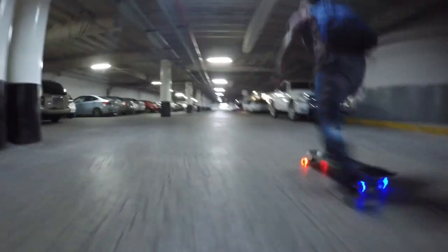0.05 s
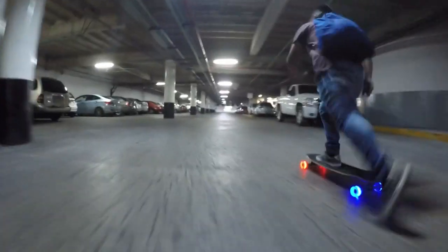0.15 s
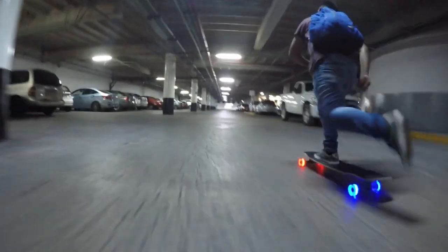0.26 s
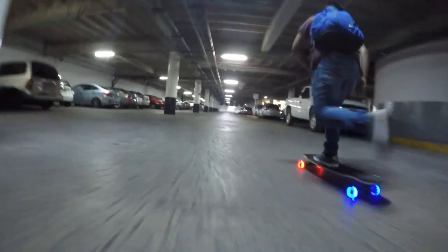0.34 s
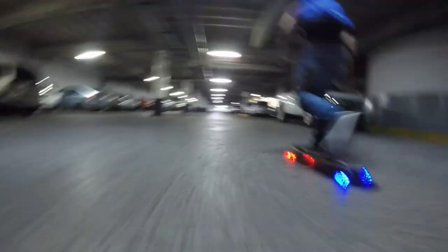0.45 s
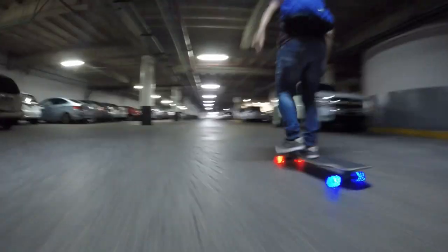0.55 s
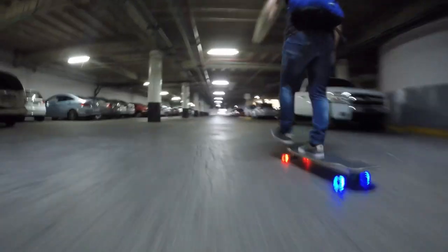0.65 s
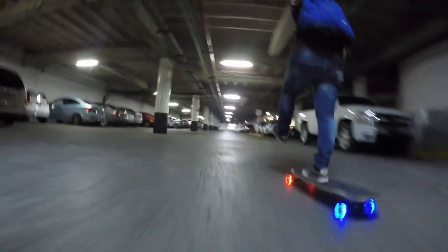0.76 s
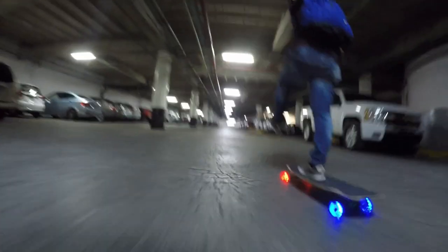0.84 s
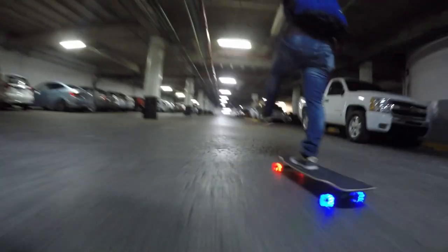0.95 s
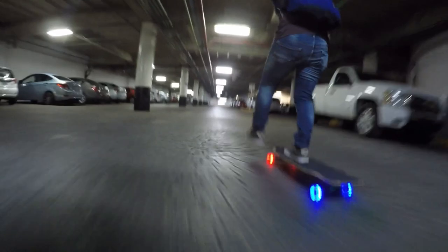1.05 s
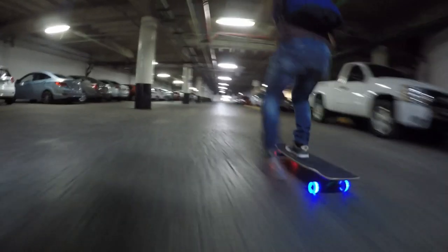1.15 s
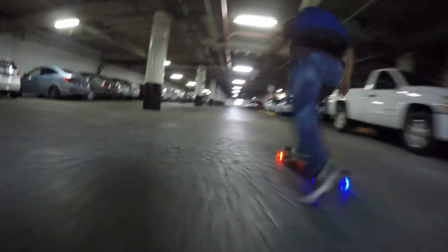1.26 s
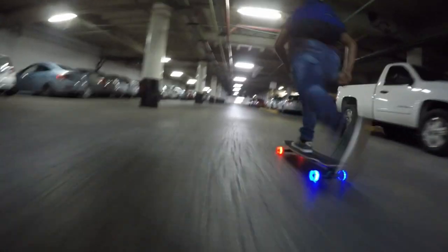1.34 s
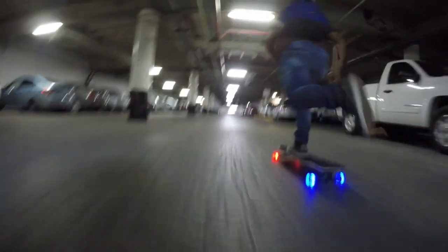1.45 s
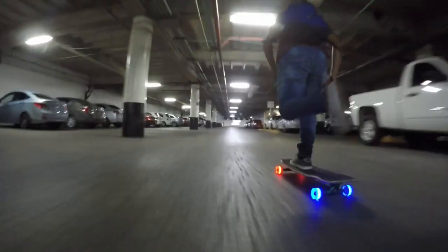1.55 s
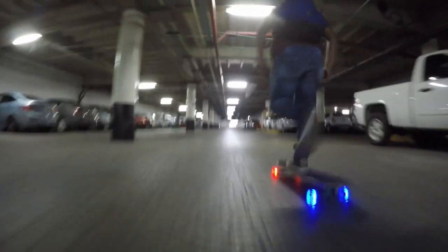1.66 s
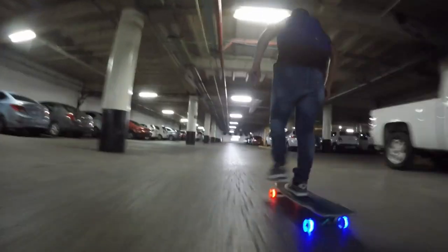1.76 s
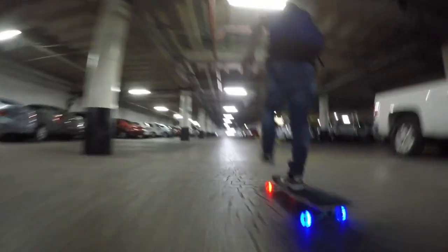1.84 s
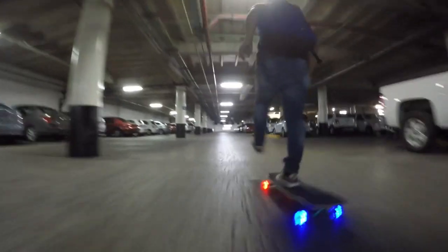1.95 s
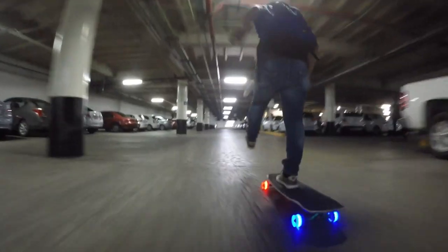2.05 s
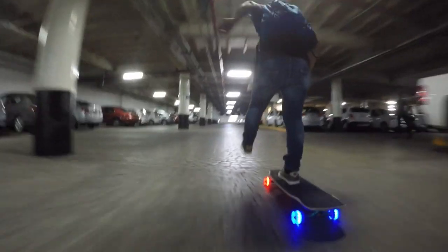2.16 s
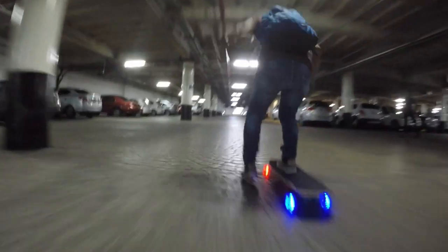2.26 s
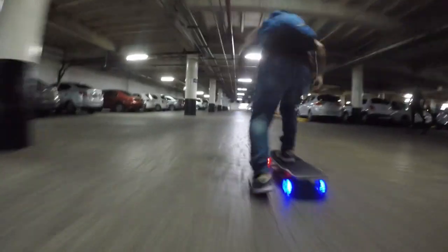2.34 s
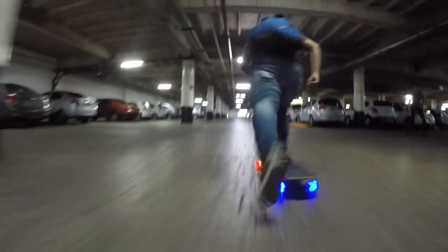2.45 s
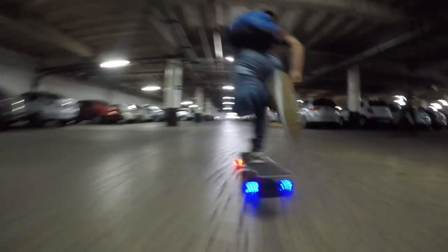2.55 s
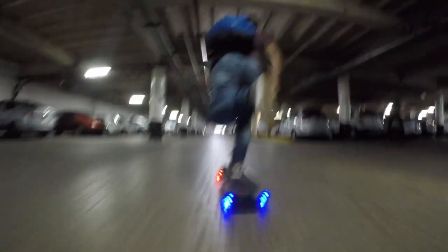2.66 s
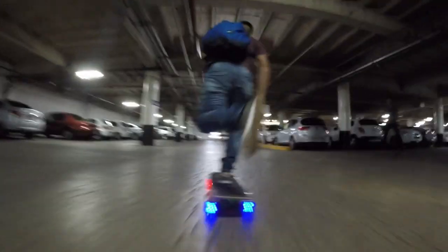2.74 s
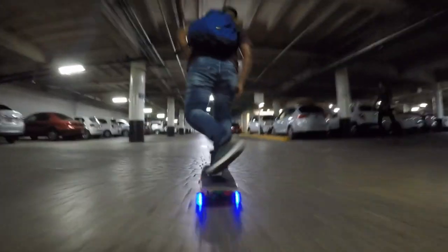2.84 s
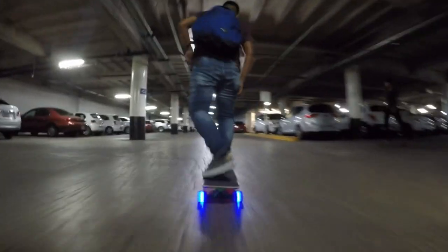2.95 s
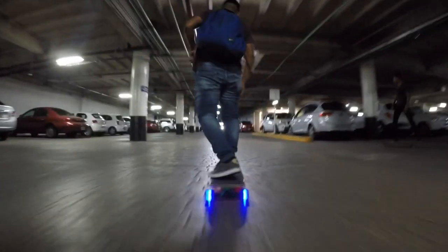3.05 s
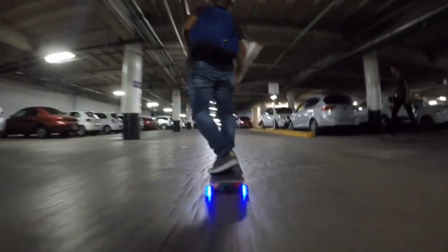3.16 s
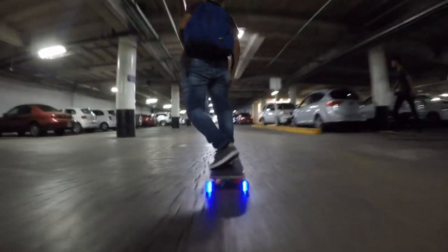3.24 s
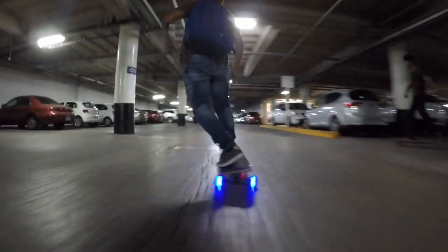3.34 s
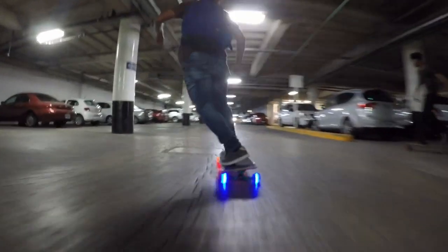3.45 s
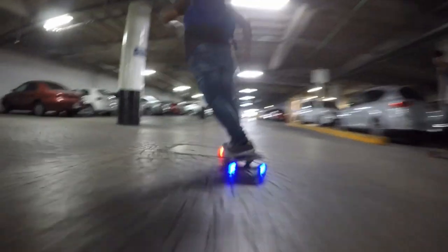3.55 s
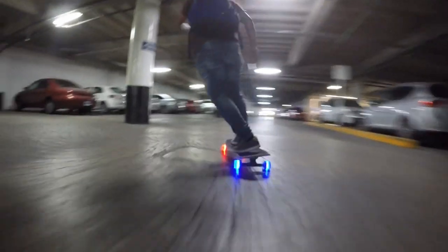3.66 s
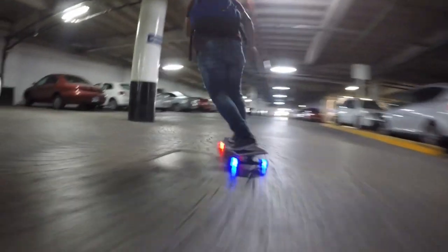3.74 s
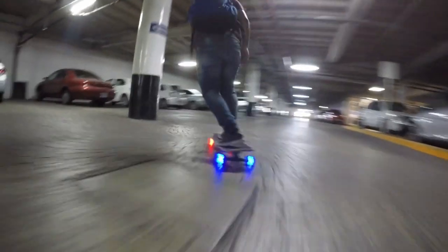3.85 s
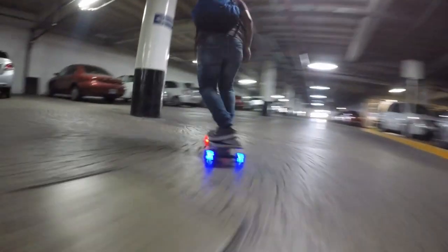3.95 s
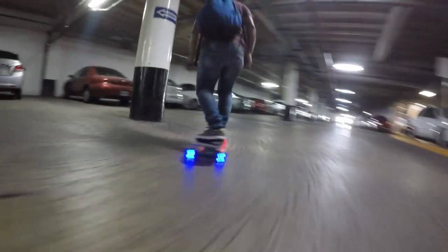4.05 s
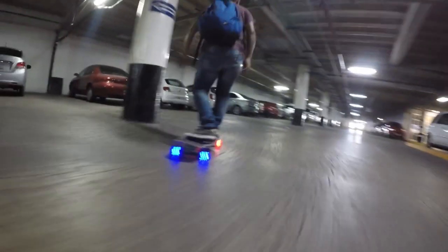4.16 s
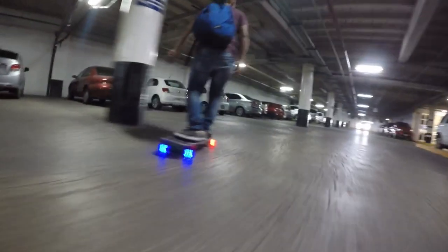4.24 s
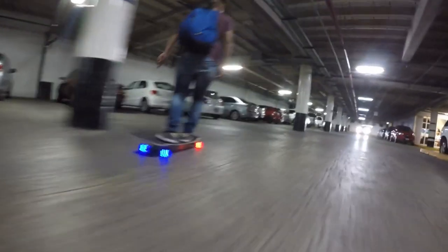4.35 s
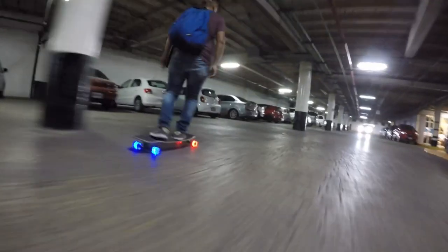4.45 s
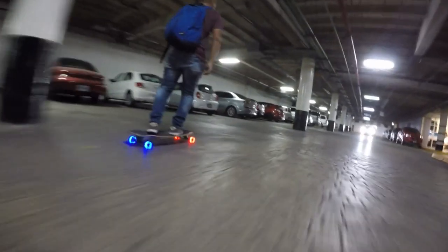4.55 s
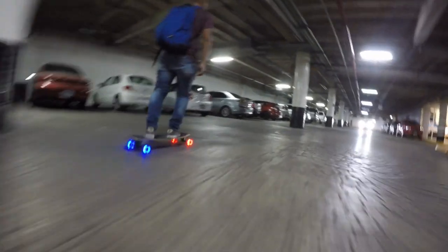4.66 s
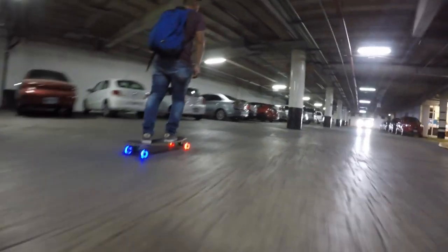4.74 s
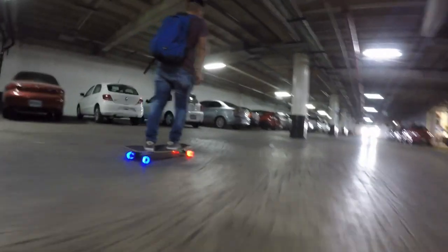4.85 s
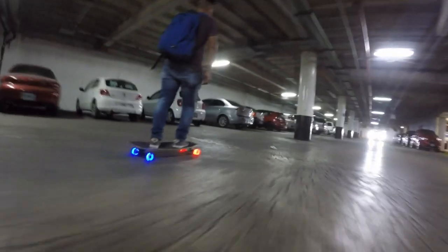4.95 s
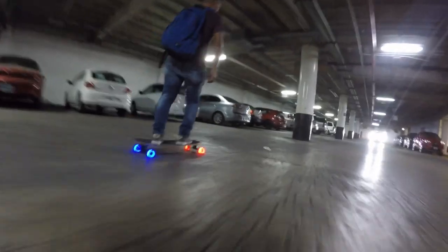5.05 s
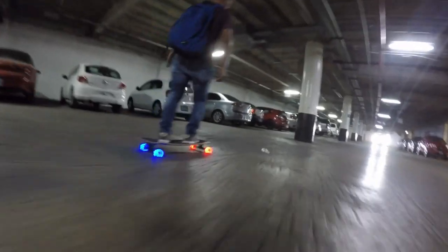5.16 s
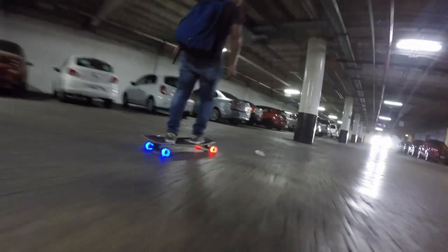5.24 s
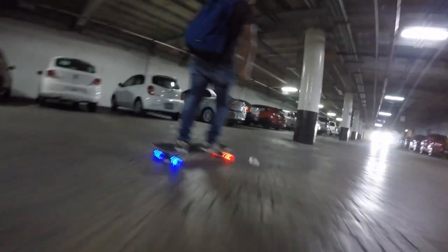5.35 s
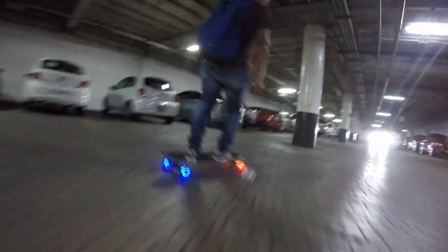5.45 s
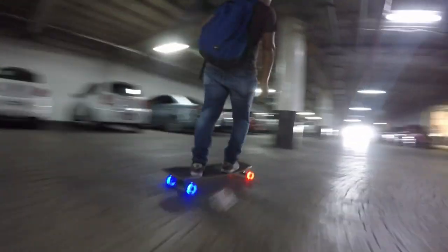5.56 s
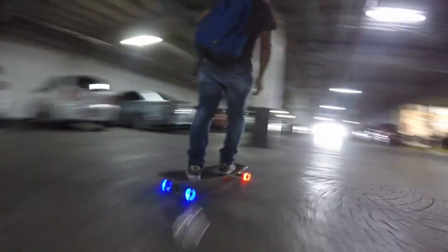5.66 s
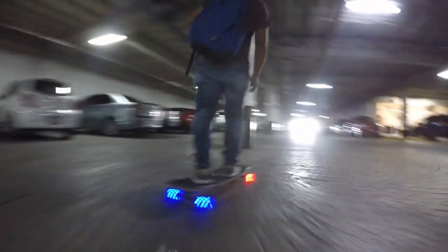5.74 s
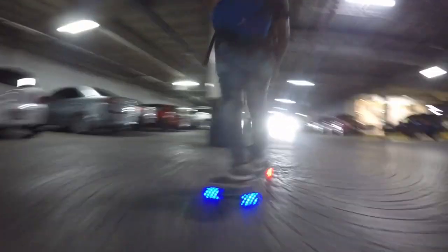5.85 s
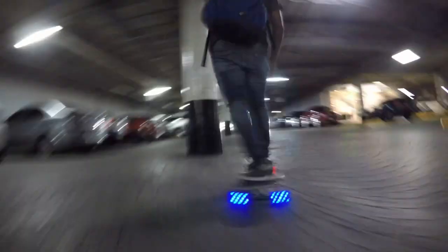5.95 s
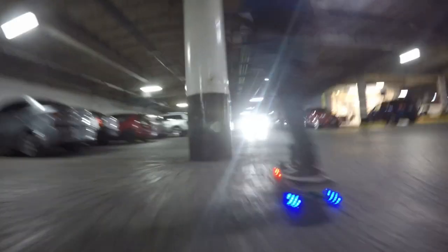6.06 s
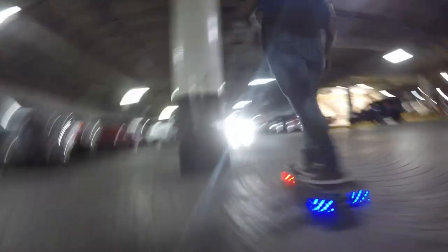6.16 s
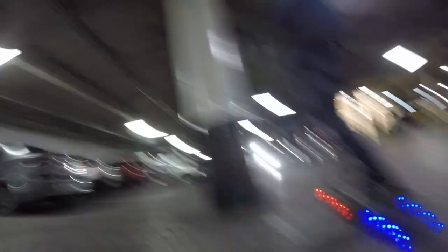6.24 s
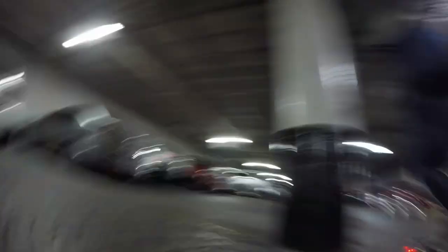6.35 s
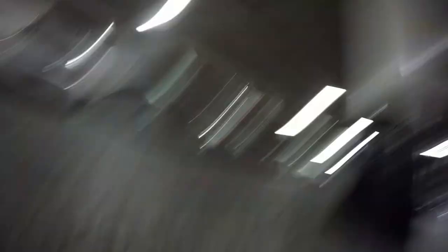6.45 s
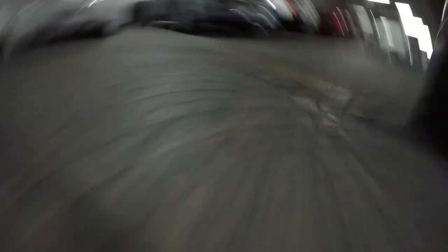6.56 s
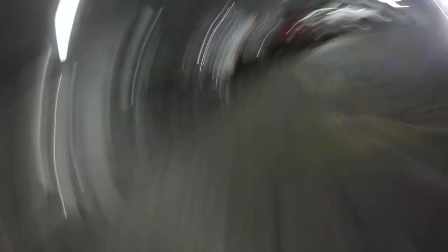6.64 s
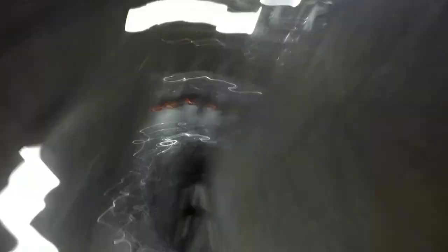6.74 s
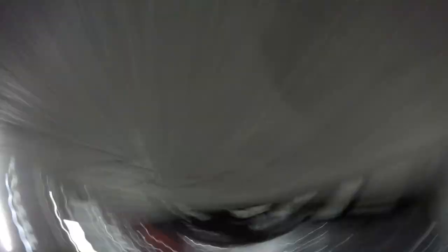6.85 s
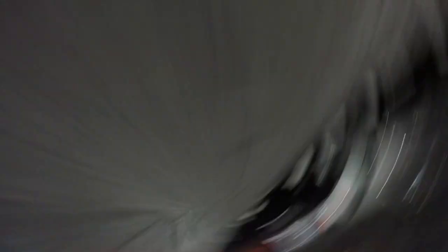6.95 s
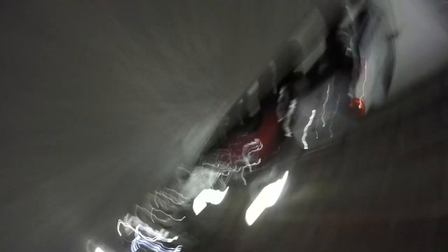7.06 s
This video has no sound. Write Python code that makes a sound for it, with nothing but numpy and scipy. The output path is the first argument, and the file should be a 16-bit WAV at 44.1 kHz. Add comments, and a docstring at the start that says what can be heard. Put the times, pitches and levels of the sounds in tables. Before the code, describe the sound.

Close rolling urethane wheels on rough concrete, with truck rattle, dry clusters of clacks and soft bassy wind buffeting, in a large reverberant garage. The roll continues for about six seconds, rougher over pitted patches. Then a short gritty skid with thin sinking squeals, raspy stick-slip chirps, a burst of low wind, and a tumbling microphone striking the floor in overloaded, pitch-diving blows before near silence.

```python
"""Longboard skid in a parking garage

A longboard rolls over concrete, the microphone riding low just behind it: shaped impact noise makes the
rumble and crackle, struck modes the clacks of loose hardware, slow noise the wind on the port.
Then the wheels skid as scraping noise with sinking squeals and chirp in stick-slip pulses, while the
microphone tumbles and knocks on the floor with pitch-diving blows and low thuds.
"""
import sys
import numpy as np
from scipy import signal
from scipy.fft import rfft, irfft
from scipy.io import wavfile
from scipy.ndimage import uniform_filter1d, map_coordinates

SR = 44100
rng = np.random.default_rng(int(sys.argv[2]) if len(sys.argv) > 2 else 0)


def unload_audio(sound):
    """Save the sound as a 16-bit wav file, at the path given as the first command line argument."""
    columns = np.transpose(np.atleast_2d(sound))
    # keep every value between -1 and 1, then stretch to whole-number steps
    steps = np.round(np.clip(columns, -1, 1) * 32767)
    wavfile.write(sys.argv[1], SR, steps.astype(np.int16))


N = 313110
T = np.arange(N) / SR  # s

# Air on the port: gusts on top of the breeze.
# Each row: centre in seconds, half length in seconds, level at the top in dB before buffeting.
GUSTS = [(0.575, 0.19, -22), (1.74, 0.085, -20), (2.66, 0.15, -23), (4.62, 0.1, -25), (6.082, 0.18, -20)]
# Spectrum of the wind. Each row: frequency in Hz, relative level in dB.
WIND_COLOUR = [(12, -8.5), (31, -0.5), (39, 5), (52, -8), (80, -15.5), (130, -34), (250, -38.5), (800, -83)]
# Roughness of the floor under the wheels. Each row: time in seconds, rumble level in dB before trim.
FLOOR_ROUGHNESS = [(0.0, -41), (0.6, -40), (0.78, -31), (0.81, -40), (1.23, -42), (2.98, -37.5),
                   (3.41, -36.5), (4.56, -44.5), (4.66, -36.5), (5.95, -42)]
# Spectrum of the rolling rumble. Each row: frequency in Hz, relative level in dB.
RUMBLE_COLOUR = [(60, -1.5), (145, 1.5), (215, -7), (360, 1.5), (460, -2.5), (610, 1.5), (760, -6),
                 (950, -4.5), (1150, -18), (1600, -12.5), (2300, -38), (5000, -66), (15000, -73.5)]
# Spectrum of grit and of the dry crack in a clack. Each row: frequency in Hz, relative level in dB.
GRIT_COLOUR = [(400, -20), (950, 9.5), (1150, -1.5), (1750, 5), (2400, -20), (2900, -0.5), (3300, -29.5),
               (3900, -11), (5000, -41), (15000, -45)]
# Pitted patches that shake the trucks.
# Each row: centre in seconds, half length in seconds, shaking level in dB before trims.
PITTED_PATCHES = [(0.607, 0.14, -37), (1.812, 0.21, -41.5), (2.596, 0.076, -36), (3.014, 0.12, -35.5),
                  (3.6, 0.2, -39.5), (5.824, 0.28, -42.5)]
# Spectrum of the hollow drone. Each row: frequency in Hz, relative level in dB.
HOLLOW_COLOUR = [(200, -30), (340, 3), (450, -11), (570, -7), (900, -23), (2500, -55)]
# Clacks of the board over bumps. Each row: start in seconds, short-term rms maximum in dB before trim.
CLACKS = [(0.202, -22.5), (0.243, -23), (0.398, -23), (0.455, -18.5), (0.621, -14.5), (0.641, -16),
          (0.652, -14.5), (0.705, -9), (0.728, -16), (0.741, -10), (0.765, -17), (0.82, -24),
          (0.982, -23.5), (1.459, -22.5), (1.772, -22), (1.849, -20), (1.871, -19), (1.93, -19),
          (2.117, -21), (2.363, -17), (2.456, -16.5), (2.56, -19.5), (2.588, -16), (2.605, -19),
          (2.726, -20), (2.866, -15), (2.886, -16), (2.934, -16), (2.962, -16.5), (3.043, -20),
          (3.057, -18.5), (3.071, -22), (3.36, -26), (3.5, -18.5), (3.514, -19.5), (3.574, -11.5),
          (3.646, -21), (3.687, -18), (3.753, -20), (3.799, -16), (3.842, -22.5), (4.71, -18.5),
          (4.815, -21), (5.054, -12.5), (5.587, -17.5), (5.624, -21), (5.654, -17.5), (5.886, -20.5)]
# Modes of deck and trucks. Each row: frequency in Hz, relative level in dB, t60 in seconds.
BOARD_MODES = [(381.5, -9.5, 0.087), (607, -6, 0.073), (830, 3, 0.041), (1023.5, 6, 0.045),
               (1283, 4.5, 0.066), (1497, 5.5, 0.035), (1730, 9.5, 0.022), (2140, 0, 0.035),
               (2543, -8.5, 0.046), (2918, -9.5, 0.03), (3740, -9.5, 0.019)]
# Spectrum of the scrape and of the tread hiss. Each row: frequency in Hz, relative level in dB.
SCRAPE_COLOUR = [(450, -12), (880, 6.5), (1150, -3), (2100, -1), (2700, 6.5), (3300, -4.5), (4000, 0),
                 (4900, -8), (7700, -14.5), (13000, -31), (15000, -41)]
# Surges in which the wheels dig in harder.
# Each row: centre in seconds, half length in seconds, friction level in dB.
SKID_SURGES = [(6.037, 0.0068, -20.5), (6.07, 0.01, -20), (6.107, 0.0093, -21.5), (6.234, 0.012, -27),
               (6.304, 0.0033, -21), (6.742, .008, -42)]
# Squeals of the sliding wheels. Each row: pitch at the centre in Hz before drift and jitter,
# level in dB against the scrape, centre in seconds, half length in seconds.
SQUEALS = [(2850, -4.5, 6.05, .07), (3980, 0.5, 6.095, 0.031), (2640, -1.5, 6.16, 0.023),
           (4100, -6, 6.23, .03)]
# Wheel chirps. Each row: start in seconds, length of the slipping in seconds, peak in dB,
# starting slip rate in Hz before jitter, brightness in dB per octave.
CHIRPS = [(5.99, 0.022, -9.5, 893, 1), (6.359, 0.021, 0.5, 1259, -1.5), (6.366, 0.025, -3, 505.3, -4),
          (6.415, 0.013, -7.5, 1125, 10), (6.427, 0.015, -5, 853, -6), (6.514, 0.018, 0, 732.6, 4),
          (6.552, 0.016, -11.5, 1050, -6), (6.603, 0.0032, -6, 1017, -0.5), (6.637, 0.019, -11.5, 973, 1.5),
          (6.66, 0.0041, -10.5, 1030, 3)]
# Modes of a chirping wheel. Each row: frequency in Hz, relative level in dB, t60 in seconds,
# all before the scatter of each chirp.
WHEEL_MODES = [(528, -9, 0.031), (1016, 2, 0.017), (1400, 9, 0.01), (2133, 9.5, 0.011), (2540, -4, 0.011),
               (3570, -8, 0.018)]
# Blows on the microphone housing. Each row: start in seconds, level in dB, starting pitch in Hz,
# time constant of the pitch fall in seconds, t60 in seconds, thud peak in dB before trim.
KNOCKS = [(6.455, -22, 1000, .014, .08, -25), (6.538, -14, 1400, .0025, 0.032, -12.5),
          (6.684, -14.5, 480, 0.0067, 0.036, -12.5), (6.703, -20.5, 483, 0.021, 0.16, -4),
          (6.7897, 1.5, 1902, 0.0054, 0.14, -5), (6.8192, -6, 2600, .01, .03, -30),
          (6.822, -1, 800, .009, 0.07, -20), (6.872, -2, 2196, 0.024, 0.042, -2),
          (6.882, -4, 2225, .008, 0.023, -5.5), (6.893, -13.5, 663, .03, 0.088, 3.5),
          (7.088, -4.5, 1000, 0.019, 0.05, -33)]
# Modes of the housing's thud. Each row: frequency in Hz, relative level in dB, t60 in seconds.
HOUSING_MODES = [(44.6, -8.5, 0.066), (83.3, 0, 0.18), (127.4, -3, 0.36), (164, 0.5, 0.089)]
# Rattles of the housing on the floor. Each row: centre in seconds, half length in seconds, level in dB.
JUDDERS = [(6.806, 0.012, -19.5), (6.894, 0.017, -17), (6.918, .016, -18)]
# Spectrum of that rattle. Each row: frequency in Hz, relative level in dB.
JUDDER_COLOUR = [(260, 3.5), (1800, -12), (2400, -20.5), (15000, -63.5)]

# air while riding and tumbling, levels before buffeting; then its fall
BREEZE_DB, TUMBLE_DB = -28, -10.5
TUMBLE_S, TUMBLE_RISE_S = 6.23, 0.052
AIR_FALL_S, AIR_FALL_DB_PER_S = 6.73, 96
# the board leaves the microphone behind; then the port rests against the floor
LEAVE_S, LEAVE_DB_PER_S = 6.56, 73
COVERED_S, COVERED_DB_PER_S = 6.82, 296.5
# shaking on an average floor before trims, and its growth per dB of rumble
SHAKING_DB, SHAKING_GROWTH_DB_PER_DB = -45.5, 0.79
HOLLOW_S, HOLLOW_HALF_S, HOLLOW_DB = 3.36, 0.17, -33.5
# a harder clack is brighter: tilt for a 0 dB row, and its change per dB
CLACK_TILT_DB_PER_OCTAVE, CLACK_TILT_GROWTH_PER_DB = 4, 0.3
# the skid bites, loses level and treble, then lets go down to a faint scuff
SKID_START_S, SKID_END_S, SKID_ATTACK_S = 5.992, 6.76, 0.053
SKID_DB, SKID_SLOW_DB_PER_S, SKID_DULL_DB_PER_S = -20.5, 23.5, 3.5
SKID_RELEASE_S, SKID_RELEASE_DB_PER_S, SCUFF_DB = 6.443, 126, -49
TOP_HZ = 15400


def undb(db):
    """Decibels to gain."""
    return 10 ** (np.asarray(db) / 20)


def curve(table):
    """Join (s, value) rows by straight lines in time."""
    return np.interp(T, *np.transpose(table))


def unit(x):
    """Scale to rms 1."""
    return x / np.sqrt(np.mean(x ** 2))


def peak(x, db):
    """Scale to a peak level."""
    return x * undb(db) / np.abs(x).max()


def colour(x, points):
    """Shape the spectrum by (Hz, dB) points, joined over log frequency; rms 1."""
    hz, db = np.transpose(points)
    bins_hz = np.maximum(np.fft.rfftfreq(len(x), 1 / SR), 1)
    gain = undb(np.interp(np.log(bins_hz), np.log(hz), db))
    return unit(irfft(rfft(x) * gain, len(x)))


def soften(x, hz, order=2):
    """Low-pass: a soft contact holds little treble."""
    return signal.sosfilt(signal.butter(order, min(hz, 0.45 * SR), fs=SR, output="sos"), x)


def walk(rate_hz):
    """Smooth random wandering, rms 1."""
    k = int(SR / rate_hz)
    steps = np.repeat(rng.standard_normal(N // k + 1), k)
    return unit(uniform_filter1d(uniform_filter1d(steps, k), k)[:N])


def grains(rate_hz, spread_db):
    """Random tiny impacts of uneven size and either sign."""
    hits = rng.random(N) < rate_hz / SR
    signs = rng.choice([-1, 1], N)
    sizes = undb(spread_db * np.minimum(rng.exponential(size=N), 4))
    return hits * signs * sizes


def ring(modes, t, scatter_db=0, detune=0):
    """Sum damped modes; scatter and detune weigh and shift them anew for each blow."""
    hz, db, t60_s = np.transpose(modes)[:, :, None]
    size, shift = rng.standard_normal((2, len(hz), 1))
    envelopes = undb(db + scatter_db * size - 60 * t / t60_s)
    return np.sum(envelopes * np.sin(2 * np.pi * hz * (1 + detune * shift) * t), axis=0)


def tilted(modes, db_per_octave):
    """Tilt the modes: a harder contact favours the higher ones."""
    lowest_hz = modes[0][0]
    return [(hz, db + db_per_octave * np.log2(hz / lowest_hz), t60_s) for hz, db, t60_s in modes]


def add(out, s, x):
    """Mix x in at time s."""
    i = int(s * SR)
    out[i:i + len(x)] += x[:N - i]


def after(s):
    """Seconds gone by since time s; zero before it."""
    return np.maximum(T - s, 0)


def swell(s, half_s):
    """A smooth rise and fall around time s, top 1."""
    return np.exp(-((T - s) / half_s) ** 2)


def parting_db():
    """Level falls as the board moves off, and faster once the port is covered."""
    return -LEAVE_DB_PER_S * after(LEAVE_S) - COVERED_DB_PER_S * after(COVERED_S)


def garage(x, wet_db=-13, low_t60_s=1.46, high_t60_s=0.74):
    """Bare concrete returns a long, dull tail, fading at parting and shut out once the port is covered."""
    t = T[:SR]
    noise = rng.standard_normal(len(t))
    low = soften(noise, 1900)
    decaying = low * undb(-60 * t / low_t60_s) + (noise - low) * undb(-60 * t / high_t60_s)
    tail = decaying * (t > 0.012)
    echo = signal.fftconvolve(x, tail / np.linalg.norm(tail))[:N]
    return echo * undb(wet_db + parting_db())


def air_strength():
    """A steady breeze with gusts, and a strong rush in the tumble; all dies away from just before the hardest knocks."""
    gusts = sum(undb(db) ** 2 * swell(s, half_s) for s, half_s, db in GUSTS)
    tumble = undb(TUMBLE_DB) * np.minimum(after(TUMBLE_S) / TUMBLE_RISE_S, 1)
    strength = np.sqrt(undb(BREEZE_DB) ** 2 + gusts + tumble ** 2)
    return strength * undb(-AIR_FALL_DB_PER_S * after(AIR_FALL_S))


def wind(swing_limit=0.807, buffet_db=2.0):
    """Eddies push on the port in uneven buffets of slow swings; the strongest are rounded off."""
    eddies = colour(rng.standard_normal(N), WIND_COLOUR)
    # gust strength comes from the air speed, not from the eddies
    even = eddies / np.sqrt(uniform_filter1d(eddies ** 2, SR // 4))
    push = even * air_strength() * undb(buffet_db * walk(14))
    return swing_limit * np.tanh(push / swing_limit)


def hollow():
    """The wheels drone over a hollow-sounding stretch of floor."""
    drone = colour(grains(2000, 4.8), HOLLOW_COLOUR)
    return drone * undb(HOLLOW_DB) * swell(HOLLOW_S, HOLLOW_HALF_S)


def shaking(load_db):
    """Strength of the crackle: it follows the floor's roughness and flares up over pitted patches."""
    steady = undb(SHAKING_DB + SHAKING_GROWTH_DB_PER_DB * (load_db - load_db.mean()))
    flares = sum(undb(db) ** 2 * swell(s, half_s) for s, half_s, db in PITTED_PATCHES)
    return np.sqrt(steady ** 2 + flares)


def wheels(rumble_db=4, boom_db=-38, grit_db=-3.0, rattle_db=-5, hiss_db=-49, turn_hz=12.0, throb_db=2.5):
    """Rough concrete shakes wheels and deck; grit crackles and trucks rattle, harder once a turn."""
    load_db = curve(FLOOR_ROUGHNESS)
    turn_rate_hz = turn_hz * (1 + 0.0876 * walk(2.2))
    turn = np.sin(2 * np.pi * np.cumsum(turn_rate_hz) / SR)
    rumble = colour(grains(2000, 3.0), RUMBLE_COLOUR) * undb(load_db + rumble_db + 1.6 * walk(35))
    # deeper boom over the first stretch of floor
    boom = colour(grains(2000, 4.6), [(20, -34.0), (160, 7.5), (330, -2.0), (4000, -92)])
    boom *= undb(boom_db) * swell(0.536, 0.56)
    grit = colour(grains(400, 7.3), GRIT_COLOUR) * undb(grit_db)
    struck = signal.fftconvolve(grains(170, 4.5), ring(BOARD_MODES, T[:SR // 20]))[:N]
    rattle = unit(soften(struck, 4500)) * undb(rattle_db)
    crackle = (grit + rattle) * shaking(load_db) * undb(throb_db * turn)
    # tread hiss follows the load only loosely
    hiss_level_db = hiss_db + 0.3 * (load_db - load_db.mean()) + 1.23 * walk(90)
    hiss = colour(rng.standard_normal(N), SCRAPE_COLOUR) * undb(hiss_level_db)
    return (rumble + boom + crackle + hiss) * undb(parting_db())


def clacks(clack_db=-6.0, chatter_db=-17, chatter_t60_s=0.028, contact_hz=4300, crack_db=-4):
    """Loose hardware strikes the deck and chatters: a dry crack and the ring of deck and trucks."""
    out, t = np.zeros(N), T[:SR // 12]
    for s, db in CLACKS:
        contact = undb(chatter_db - 60 * t / chatter_t60_s) * rng.standard_normal(len(t))
        contact[0] += 1  # the first strike
        tilt = CLACK_TILT_DB_PER_OCTAVE + CLACK_TILT_GROWTH_PER_DB * db
        modes = ring(tilted(BOARD_MODES, tilt), t, scatter_db=2, detune=0.02)
        ringing = unit(signal.fftconvolve(soften(contact, contact_hz, order=4), modes)[:len(t)])
        crack = colour(rng.standard_normal(len(t)), GRIT_COLOUR) * undb(-60 * t / chatter_t60_s)
        clack = ringing + undb(crack_db) * unit(soften(crack, contact_hz))
        loudest_rms = np.sqrt(uniform_filter1d(clack ** 2, size=128).max())
        add(out, s, clack / loudest_rms * undb(db + clack_db))
    return out


def judders():
    """The housing and its mount chatter against the concrete before they settle."""
    strength = sum(undb(db) * swell(s, half_s) for s, half_s, db in JUDDERS)
    return colour(grains(1500, 2.3), JUDDER_COLOUR) * strength


def knocks(rough_db=-3.0, thud_db=-2, snap_db=-12, snap_t60_s=0.04, lowest_hz=70):
    """The housing hits the floor: a snap, a rough body diving as the contact spreads, a low thud."""
    out, t = np.zeros(N), T[:SR // 3]
    for s, db, hz, fall_s, t60_s, low_db in KNOCKS:
        cycles = np.cumsum(lowest_hz + (hz - lowest_hz) * np.exp(-t / fall_s)) / SR
        rough = colour(rng.standard_normal(len(t)), [(hz / 2, -5), (hz, 0), (hz * 2, -11), (hz * 10, -44)])
        # the noise dives along with the tone
        diving_noise = np.interp(cycles / hz, t, rough)
        body = np.sin(2 * np.pi * cycles) + undb(rough_db) * diving_noise
        snap = rough * undb(snap_db - 60 * t / snap_t60_s)
        # the push builds up over about one cycle
        onset = 1 - np.exp(-(2 * hz * t) ** 2)
        blow = (body * undb(-60 * t / t60_s) + snap) * onset
        thud = peak(ring(HOUSING_MODES, t), low_db + thud_db)
        add(out, s, blow * undb(db) + thud)
    return out


def chirps(sag=0.06, jitter=0.04, rasp=0.083, contact_hz=4500, droop_per_s=3.0):
    """Wheels grip and let go in bursts of sagging stick-slip pulses; the ring of the earlier ones droops."""
    out = np.zeros(N)
    for s, length_s, db, start_hz, bright_db_per_octave in CHIRPS:
        u = np.linspace(0, 1, int(length_s * SR))
        rate_hz = start_hz * (1 - sag * u) * (1 + jitter * walk(700)[:len(u)])
        # one pulse per slip, less the mean
        pulses = np.diff(np.floor(np.cumsum(rate_hz) / SR), prepend=-1) - rate_hz / SR
        slips = pulses + rasp * rng.standard_normal(len(u))
        pressure = np.minimum(u / 0.11, 1) * (1 - u) ** 0.43
        modes = tilted(WHEEL_MODES, bright_db_per_octave)
        wheel = ring(modes, T[:SR // 40], scatter_db=2.0, detune=0.01)
        chirp = signal.fftconvolve(slips * pressure, wheel)
        t = T[:len(chirp)]
        # the ring droops only in the earlier chirps; the slip rate sags in all
        droop = droop_per_s * (s < LEAVE_S)
        warped = np.interp(t * (1 - droop * (t - length_s) / 2), t, chirp)
        add(out, s, peak(soften(warped, contact_hz, order=3), db))
    return out


def skid_friction():
    """Friction bites, weakens as the board slows and lets go to a scuff, with surges on top."""
    age_s = after(SKID_START_S)
    fall_db = SKID_SLOW_DB_PER_S * age_s + SKID_RELEASE_DB_PER_S * after(SKID_RELEASE_S)
    steady = undb(SKID_DB - fall_db) + undb(SCUFF_DB)
    bite = 1 - np.exp(-age_s / SKID_ATTACK_S)
    surges = sum(undb(db) ** 2 * swell(s, half_s) for s, half_s, db in SKID_SURGES)
    return np.sqrt((steady * bite) ** 2 + surges)


def skid(judder_db=2.0, squeal_drift=0.012, squeal_jitter=0.04, squeal_swing_db=3,
         squeal_fall_per_s=0.4, wander=0.045):
    """Urethane scrapes sideways: gritty surges with fitful, sinking squeals, dulling as the board slows."""
    # the contact patch flexes, so the resonances of the scrape wander
    flexed = np.cumsum(1 + wander * walk(30))
    rush = map_coordinates(colour(grains(2200, 2.3), SCRAPE_COLOUR), [flexed], mode="mirror")
    for hz, db, s, half_s in SQUEALS:
        unsteady = squeal_drift * walk(40) + squeal_jitter * walk(900)
        pitch_hz = hz * (1 + unsteady - squeal_fall_per_s * (T - s))
        level = undb(db + squeal_swing_db * walk(150)) * swell(s, half_s)
        rush = rush + np.sin(2 * np.pi * np.cumsum(pitch_hz) / SR) * level
    scrape = rush * skid_friction() * undb(judder_db * walk(260))
    body = soften(scrape, 4500, order=1)
    treble = (scrape - body) * undb(-SKID_DULL_DB_PER_S * after(SKID_START_S))
    sliding = (T > SKID_START_S) * (T < SKID_END_S)
    return sliding * (body + treble)


def scene():
    """The board in the garage, plus chirps, wind and what strikes the microphone, without echo."""
    board = wheels() + hollow() + clacks() + skid()
    direct = chirps() + knocks() + judders() + wind()
    return (board + garage(board) + direct)[None]


def record(dry):
    """The loudest peaks overload the input and clip; the top is cut."""
    clipped = np.clip(dry, -0.95, 0.95)
    return signal.sosfilt(signal.ellip(8, 0.2, 70, TOP_HZ, fs=SR, output="sos"), clipped)


dry = scene()
out = record(dry)
unload_audio(out)
```